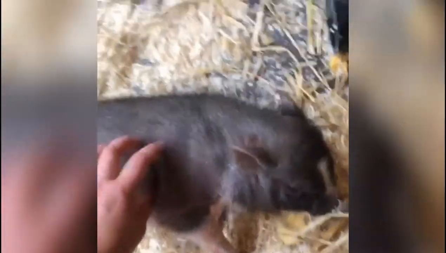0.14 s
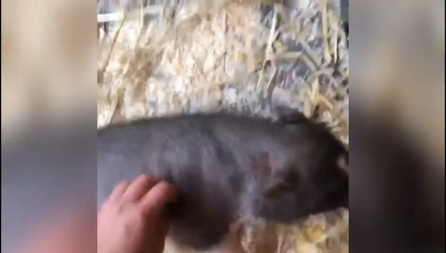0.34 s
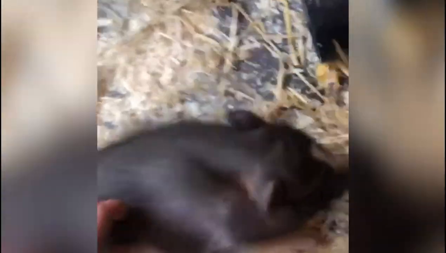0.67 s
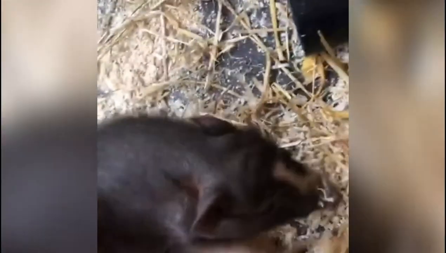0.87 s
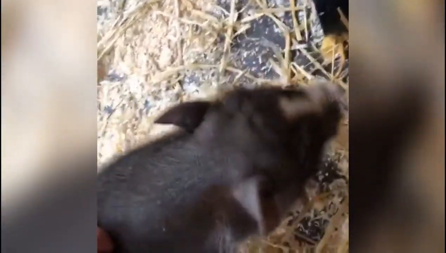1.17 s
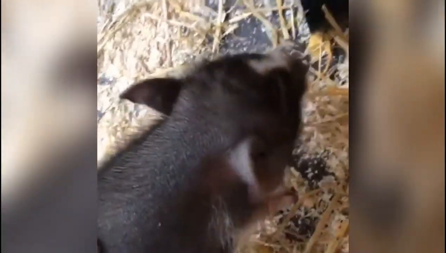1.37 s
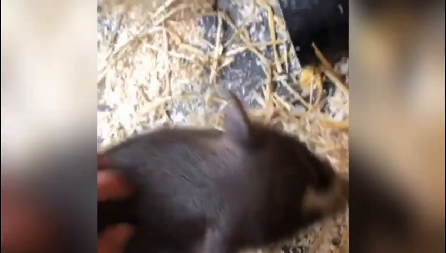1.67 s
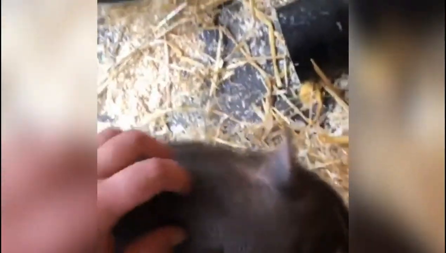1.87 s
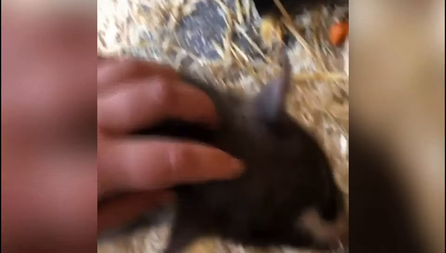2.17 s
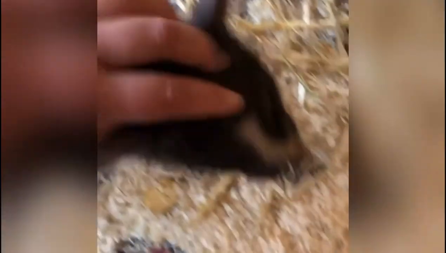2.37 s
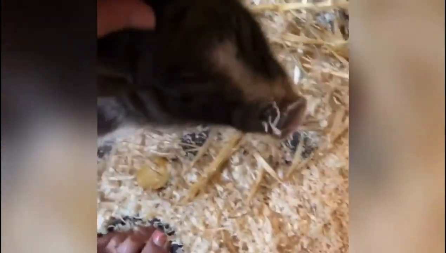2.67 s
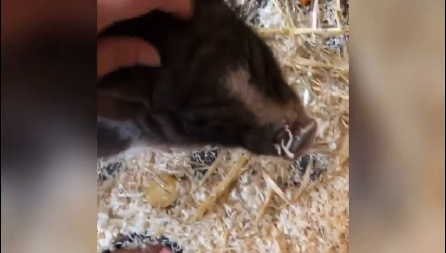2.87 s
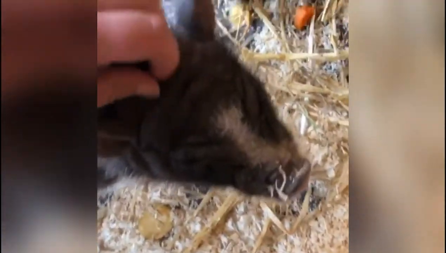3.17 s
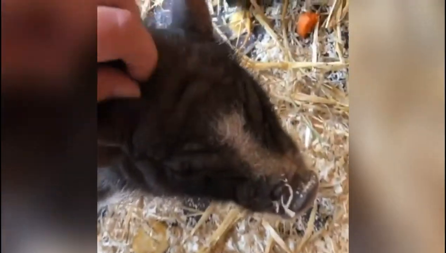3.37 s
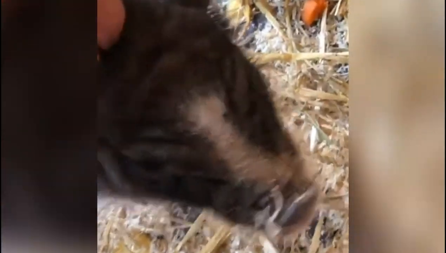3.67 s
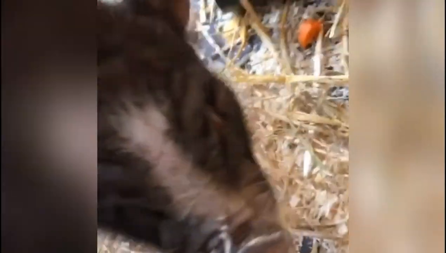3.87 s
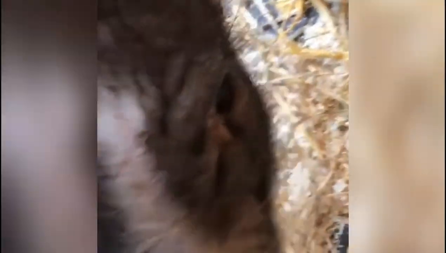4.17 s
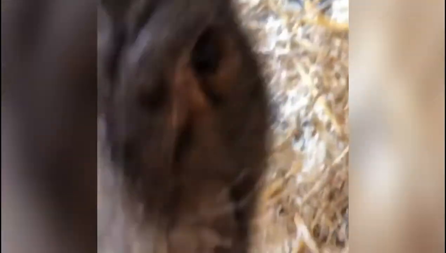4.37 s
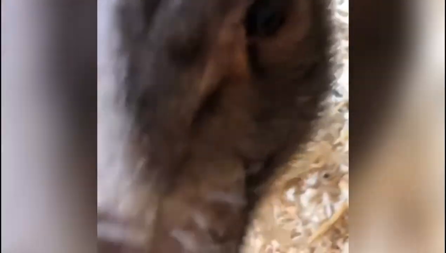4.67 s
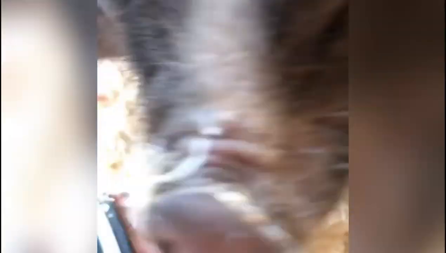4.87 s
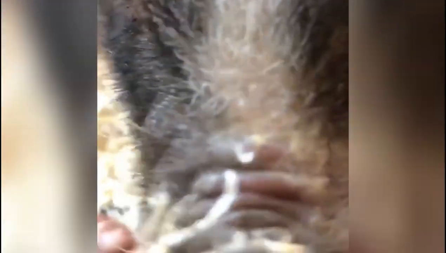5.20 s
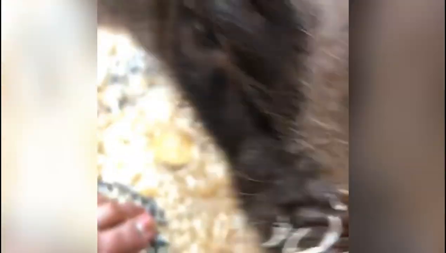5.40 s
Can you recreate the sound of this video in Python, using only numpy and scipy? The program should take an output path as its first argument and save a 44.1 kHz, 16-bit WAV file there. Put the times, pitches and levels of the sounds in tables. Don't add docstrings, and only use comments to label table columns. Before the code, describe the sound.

A piglet gives short, low, raspy grunts and soft sniffs close up, amid straw rustles, over a steady low machine hum.

```python
import sys
import numpy as np
from scipy import signal
from scipy.io import wavfile
from scipy.ndimage import uniform_filter1d

SR = 44100
rng = np.random.default_rng(int(sys.argv[2]) if len(sys.argv) > 2 else 0)


def file_out(sig):
    cols = np.atleast_2d(sig).T
    lim = np.clip(cols, -1, 1)
    pcm = np.round(lim * 32767).astype(np.int16)
    wavfile.write(sys.argv[1], SR, pcm)


def nominal_scale(level):
    x = np.asarray(level, float) / 20
    return 10 ** x


N = 244314


def evened(x):
    return x / np.sqrt(np.mean(x ** 2) + 1e-20)


def read(points, hz):
    f, value = np.transpose(points)
    return np.interp(np.log(hz + 1), np.log(f + 1), value)


def add(mix, s, sound):
    part = mix[round(s * SR):][:len(sound)]
    part += sound[:len(part)]


def resonate(x, hz, width):
    r = np.exp(-np.pi * width / SR)
    return 2 * signal.lfilter([1 - r], [1, -r * np.exp(2j * np.pi * hz / SR)], x).real


def steep(x, hz, width):
    return resonate(resonate(x, hz, width), hz, 2 * width)


def hiss(colour, patchy_db):
    hz = np.fft.rfftfreq(512, 1 / SR)
    real, imaginary, patches = rng.standard_normal((N // 128 + 5, 257, 3)).T
    patches = uniform_filter1d(patches, size=8, axis=0)
    patches = evened(uniform_filter1d(patches, size=14, axis=1))
    level_db = read(colour, hz)[:, None] + patchy_db * patches
    spectrum = (real + 1j * imaginary) * 10 ** (level_db / 20)
    return evened(signal.istft(spectrum, nperseg=512, noverlap=384)[1][:N])


def swell(t, peak, length, db, shape):
    rise_db, hold, fall_db = shape
    u = (t - peak) / length
    return nominal_scale(db + rise_db * np.minimum(u, 0) - fall_db * np.maximum(u - hold, 0))


def bump(t, at, db, length):
    return nominal_scale(db) * np.exp(-((t - at) / (length / 2)) ** 2)


def chest_boom(t, slaps, length, chest_hz, chest_s, chest_db, belly):
    # rise in dB per grunt length, hold as share of the length, fall in dB per length
    chest_shape = (34, 0.21, 48)
    belly_hz, belly_db = belly
    thump = slaps * swell(t + 0.011, chest_s, length, chest_db, chest_shape)
    blow = np.exp(-((np.arange(260) / SR - .0024) / 0.00095) ** 2) / 80
    thump = np.convolve(thump, blow)[:len(t)]
    chest = nominal_scale(25.0) * steep(thump, chest_hz, 38.0)
    chest -= nominal_scale(13) * resonate(thump, 220, 75)
    return chest - nominal_scale(21.0 + belly_db) * steep(thump, belly_hz, 16.5)


def throat_ring(t, slaps, breath, length, mouth_s, throat_db, cavities):
    # rise in dB per grunt length, hold as share of the length, fall in dB per length
    throat_shape = (31.5, 0.29, 15.6)
    flutter = (slaps + breath) * swell(t, mouth_s, length, throat_db, throat_shape)
    return nominal_scale(15.0) * sum(nominal_scale(db) * steep(flutter, hz, 30 + 0.13 * hz) for hz, db in cavities)


def snout_rasp(t, slaps, noise, leak, length, mouth_s, rasp_db, cavities):
    # rise in dB per grunt length, hold as share of the length, fall in dB per length
    rasp_shape = (46, .5, 60)
    level = swell(t, mouth_s, length, rasp_db, rasp_shape)
    puff = np.exp(-(np.arange(400) / SR / .0034) ** 2) / 10
    puffs = np.convolve(slaps * level, puff)[:len(t)]
    spit = 0.37 * slaps * level + noise * (puffs + leak * level)
    rasp = sum(nominal_scale(db) * steep(spit, hz, 240 + .075 * hz) for hz, db in cavities)
    return nominal_scale(7.5) * rasp + nominal_scale(18) * steep(spit * level, 6750, 2800)


def grunt(call, effort, tract):
    first, last, rate, lead, rough = call
    mouth_s, chest_s, chest_db, throat_db, rasp_db = effort
    belly, throat_cavities, snout_cavities = tract[0], tract[1:4], tract[4:]
    length = last - first
    start = first - .02
    t = start + np.arange(SR // 4) / SR
    shake, noise = rng.standard_normal((12, 2)), rng.standard_normal((2, len(t)))

    beats = first + 0.0004 + (np.arange(12) + 0.1 * rough * shake[:, 0]) / rate
    beats = np.append(beats[beats <= last], first - lead if lead else [])
    slaps = np.zeros(len(t))
    strength = nominal_scale(4.0 * rough * shake[:len(beats), 1])
    slaps[((beats - start) * SR).astype(int)] = strength * np.sqrt(SR / rate)
    sounding = np.interp(t, [first - .012, first + 0.0047, last + 0.02, last + 0.073], [0, 1, 1, 0])

    chest_hz = 2.059 * rate
    chest = chest_boom(t, slaps, length, chest_hz, chest_s, chest_db, belly)
    breath = 3.54 * rough * sounding * noise[0]
    throat = throat_ring(t, slaps, breath, length, mouth_s, throat_db, throat_cavities)
    leak = 2 * rough ** 2 * sounding
    rasp = snout_rasp(t, slaps, noise[1], leak, length, mouth_s, rasp_db, snout_cavities)

    fading = np.exp(-np.maximum(t - last, 0) / 0.028) * np.clip((t - first) / length, 0, 1)
    rasp += nominal_scale(rasp_db - 2.5) * steep(noise[0] * fading, snout_cavities[0][0], 130)
    throat += nominal_scale(throat_db + 8.5) * steep(noise[1] * fading, throat_cavities[0][0], 190)
    soft = signal.butter(3, 9500, fs=SR, output="sos")
    return start, chest + throat + signal.sosfilt(soft, rasp)


def piglet_grunts():
    # first steady pulse in seconds, last pulse in seconds, rate in pulses
    # per second, lead-in gap in seconds, roughness from 0 to 1
    calls = [
        (.376, .458, 75, 0, .4),
        (1.0815, 1.16, 70.5, 0, .85),
        (1.458, 1.49, 75, 0, .4),
        (2.3872, 2.452, 79, .009, .25),
        (4.404, 4.462, 72, .0085, .2),
        (4.9598, 5.005, 69.5, .008, .12),
        (5.207, 5.25, 72, 0, .5),
        (5.4235, 5.496, 71.5, 0, .12),
    ]
    # mouth peak in seconds, chest peak in
    # seconds, chest level in dB, throat level in dB, rasp level in dB
    efforts = [
        (0.389, 0.411, -22, -28, -45),
        (1.095, 1.116, -24.5, -38.5, -40),
        (1.443, 1.458, -18.5, -38.5, -55),
        (2.396, 2.427, -16.5, -31, -33.5),
        (4.415, 4.441, -14.5, -26.5, -31.5),
        (4.969, 4.988, -17.5, -28.5, -27),
        (5.202, 5.217, -24.5, -40.5, -48),
        (5.446, 5.475, -17.5, -27.5, -33.5),
    ]
    # frequency in Hz, level in dB
    tracts = [
        [(84, -5), (380, 1), (465, -1), (830, -13), (2750, 3), (4050, -0.5), (4750, -6)],
        [(86.7, 4), (328, -1.5), (665, -2.5), (1000, -6.5), (2400, 0), (1670, -10), (5270, -18)],
        [(90, 2.5), (300, -1), (500, -6), (750, -2.5), (2500, -7), (4000, 2.5), (6000, -12)],
        [(83, -13), (382, 2.5), (630, -7), (1000, -10), (2570, 1), (2140, 2), (4030, -15)],
        [(80, -9), (350, 1.5), (800, -5), (1370, -11), (2650, 3.5), (4400, 0), (6500, -10)],
        [(76, -11), (415, 7.5), (860, 7.5), (1040, -4.5), (2620, -1.5), (4400, -2.5), (7000, -27)],
        [(84, -48), (380, 2.5), (600, -2), (900, -2.5), (2000, -3), (3800, 2), (4700, -8)],
        [(80, -5), (400, 4), (790, -8), (980, -3), (2800, 6), (4000, 3.5), (4750, -1.5)],
    ]
    voice = np.zeros(N)
    for parts in zip(calls, efforts, tracts):
        add(voice, *grunt(*parts))
    return voice


def sniff(row, whistles):
    start, peak, end, db = row
    t = np.arange(start, end, 1 / SR)
    air, flutter = rng.standard_normal((len(t), 2)).T
    air = air * nominal_scale(2.2 * evened(uniform_filter1d(flutter, size=250)))
    tone = sum(nominal_scale(gain_db) * evened(steep(air, hz, width)) for hz, width, gain_db in whistles)
    level_db = db + np.interp(t, [start, peak, end], [-5.5, 0, -10])
    return start, nominal_scale(level_db - 3.0) * tone * signal.windows.tukey(len(t), .3)


def piglet_sniffs():
    # start in seconds, peak in seconds, end in seconds, level in dB
    breaths = [
        (1.151, 1.21, 1.4, -48.5),
        (2.55, 2.716, 2.98, -56.5),
        (3.828, 4.09, 4.65, -54.5),
        (5.068, 5.218, 5.255, -49),
    ]
    # frequency in Hz, width in Hz, level in dB
    nostrils = [
        [(1790, 680, -4), (4000, 1100, -1), (840, 1450, 8)],
        [(2000, 770, -3.5), (4940, 2900, 4), (6500, 1500, -15)],
        [(2300, 1400, -12), (4500, 1200, 0), (5300, 1400, -13)],
        [(840, 270, 1.5), (3820, 610, -1.5), (4470, 310, -2), (1820, 2500, 5)],
    ]
    air = np.zeros(N)
    for parts in zip(breaths, nostrils):
        add(air, *sniff(*parts))
    return air


def snap(s, db, hz, width):
    burst = rng.standard_normal(600) * np.exp(-(np.arange(600) / SR / .0028) ** 2)
    ring = steep(burst, hz, width)
    return s, nominal_scale(db) * ring / abs(ring).max()


def snaps_and_smacks():
    # time in seconds, peak level in dB, ring frequency in Hz, ring width in Hz
    releases = [(0.711, -44, 2920, 3000), (0.957, -34, 4000, 4000), (1.089, -33, 6540, 4000),
                (1.594, -37, 2220, 800), (1.687, -37, 2400, 1200), (1.794, -29.5, 6030, 4000),
                (1.837, -37, 3000, 2500), (1.952, -41, 6300, 1500), (2.327, -35, 10000, 6000),
                (4.198, -65, 9000, 3000), (4.262, -47, 7500, 5000), (4.565, -43, 6500, 2500),
                (4.634, -54, 9970, 4000), (4.678, -45.5, 7960, 4000), (4.691, -43, 5800, 4000),
                (4.722, -49, 7000, 5000), (4.756, -50, 11000, 4000), (4.763, -34, 1580, 395),
                (4.764, -38, 3250, 700), (4.773, -44, 3700, 700), (4.862, -44, 6850, 5000),
                (4.885, -42, 7200, 5000), (4.9, -42, 2150, 400), (5.044, -36, 1000, 150),
                (5.134, -40, 840, 200), (5.298, -42, 6800, 3000), (5.311, -43, 2800, 1500),
                (5.361, -34.5, 930, 200)]
    clicks = np.zeros(N)
    for row in releases:
        add(clicks, *snap(*row))
    return clicks


def rustle():
    # frequency in Hz, density in dB per Hz
    fizz_colour = [(1470, 2), (2500, -1.5), (3610, -2.5), (7420, 0.5), (13000, -6), (14200, -4),
                   (14500, -14)]
    # frequency in Hz, density in dB per Hz
    shuffle_colour = [(300, -69), (700, -3), (2000, 1.5), (4000, -4.5), (7000, -13.5)]
    # frequency in Hz, density in dB per Hz
    coat_colour = [(3000, -12), (6500, 3.5), (9500, -10), (13000, 1), (15000, -3)]
    # time in seconds, level in dB, length in seconds
    finger_strokes = [(0.105, -67, .03), (0.817, -51, 0.28), (1.785, -44.5, 0.018), (1.84, -47, .04),
                      (2.056, -57, 0.022), (3.019, -58.5, 0.028), (3.133, -59.5, 0.057),
                      (3.254, -58.5, 0.041), (3.385, -60.5, 0.059), (3.47, -64, .02), (3.583, -58, 0.046),
                      (3.684, -61.5, 0.036), (3.791, -57.5, 0.026)]
    # time in seconds, level in dB
    restlessness = [(0, -66.5), (.3, -63), (1.0, -60.5), (1.6, -57), (2.2, -61), (2.9, -62), (3.2, -77),
                    (3.7, -68), (3.9, -59.5), (4.4, -61), (4.6, -69.5), (5.54, -70)]
    # time in seconds, length in seconds,
    # fizz level in dB, shuffle level in dB
    stirs = [(0.12, 0.041, -59.5, -49), (0.436, 0.3, -55, -55), (0.782, 0.3, -51.5, -59),
             (.93, 0.081, -59.5, -48), (1.106, 0.093, -47.5, -43), (1.215, 0.1, -56, -39),
             (1.46, 0.83, -63.5, -46), (1.775, 0.033, -65, -43), (1.857, 0.11, -47.5, -45.5),
             (2.02, .12, -61, -62), (2.338, 0.023, -61, -59), (2.448, 0.095, -55, -38.5),
             (2.715, 0.39, -69, -51), (4.454, 0.067, -47, -36), (4.736, 0.11, -64, -79),
             (4.915, 0.11, -61, -52), (5.006, 0.048, -47.5, -64), (5.07, 0.11, -52.5, -48),
             (5.195, 0.088, -70, -39.5), (5.4, 0.24, -69, -49), (5.508, 0.051, -48.5, -39.5)]
    t = np.arange(N) / SR
    bed = nominal_scale(np.interp(t, *np.transpose(restlessness)))

    sizes = nominal_scale(0.39 * np.minimum(rng.exponential(1, N), 5))
    slips = sizes * (rng.random(N) < 500 / SR)
    crackle = evened(1 + .5 * np.convolve(slips, np.exp(-np.arange(300) / 60))[:N])

    strokes = sum(bump(t, *row) for row in finger_strokes)
    fizz = bed + nominal_scale(-16.5) * strokes
    fizz += sum(bump(t, s, db, length) for s, length, db, _ in stirs)
    shuffle = nominal_scale(-1) * bed + sum(bump(t, s, db, length) for s, length, _, db in stirs)
    fizz = fizz * hiss(fizz_colour, patchy_db=1.5)
    shuffle = nominal_scale(-9.5) * shuffle * hiss(shuffle_colour, patchy_db=2.5)
    return crackle * (fizz + shuffle + strokes * hiss(coat_colour, patchy_db=1.2))


def pen(x):
    # frequency in Hz, time to fall by 60 dB in seconds
    decay = [(100, 0.57), (400, 0.17), (2500, 0.28), (8000, 0.17)]
    taps = np.zeros(SR // 2)
    at = np.arange(200, len(taps) - 20, 20)
    taps[at + rng.integers(0, 20, len(at))] = rng.choice([-1., 1.], len(at))
    hz, t, z = signal.stft(taps, SR, nperseg=256)
    t60 = np.maximum(read(decay, hz), .05)[:, None]
    tail = signal.istft(z * nominal_scale(-60 * t / t60), SR, nperseg=256)[1]
    return signal.fftconvolve(x, tail / np.linalg.norm(tail))[:N]


def room():
    # frequency in Hz, rms level in dB, starting phase in turns
    hum_lines = [(38.645, -42, .06), (154.58, -40, .44), (165.93, -45.5, .05), (232.05, -62, .3),
                 (309.1, -66, .6), (386.45, -72, .2), (618.3, -69, .7), (695.6, -72, .1), (927.5, -71, .4)]
    # frequency in Hz, width in Hz, level in dB
    modes = [(39.2, 16, -56), (52, 9.1, -76), (94.7, 15, -52.5), (167.7, 70, -50), (225.7, 15.5, -61),
             (434, 49, -61.5)]
    # frequency in Hz, density in dB per Hz
    wash_colour = [(150, -53), (260, 2), (436, -6), (719, -11), (795, -1.5), (1230, -7.5), (1520, -10.5),
                   (12900, -31), (14000, -54)]
    t, air = np.arange(N) / SR, rng.standard_normal(N)
    hum = sum(np.sqrt(2) * nominal_scale(db) * np.cos(2 * np.pi * (hz * t + turn)) for hz, db, turn in hum_lines)
    rumble = sum(nominal_scale(db) * evened(resonate(resonate(air, hz, w), hz, w)) for hz, w, db in modes)
    return hum + rumble + nominal_scale(-55) * hiss(wash_colour, patchy_db=2.0)


def scene():
    voice = piglet_grunts() + snaps_and_smacks()
    near = piglet_sniffs() + rustle()
    return (voice + nominal_scale(-11.5) * pen(voice) + near + room())[None]


def band_limit(x):
    return signal.sosfilt(signal.butter(12, 14790, fs=SR, output="sos"), x)


def record(dry):
    edge = signal.firwin(401, 14100, window=("kaiser", 9), fs=SR)
    mix = signal.oaconvolve(dry, edge[None], "same")
    return band_limit(mix)


dry = scene()
out = record(dry)
file_out(out)
```